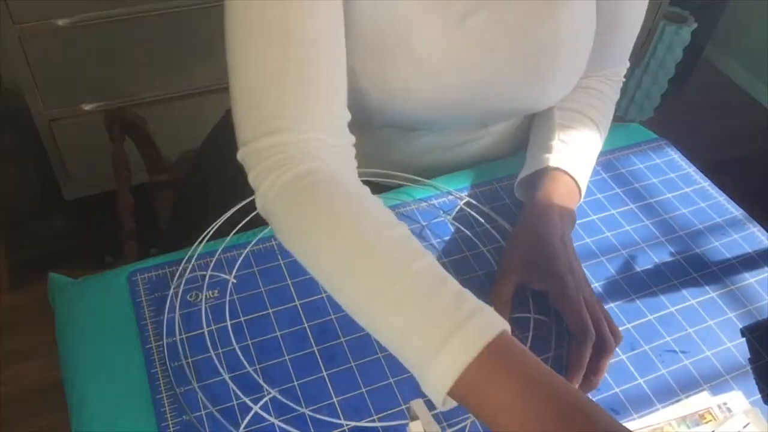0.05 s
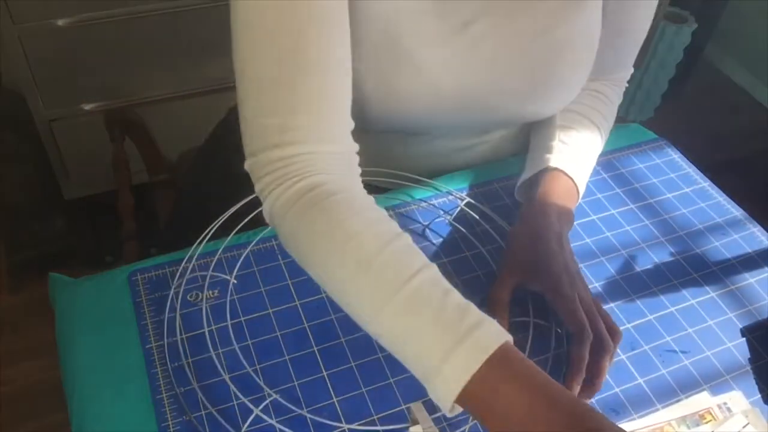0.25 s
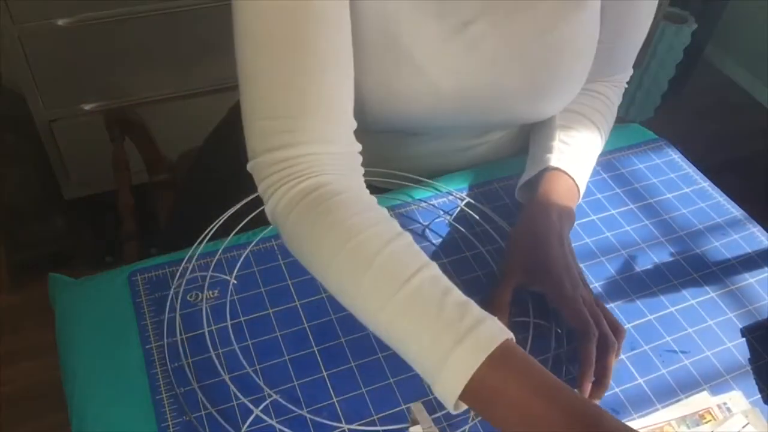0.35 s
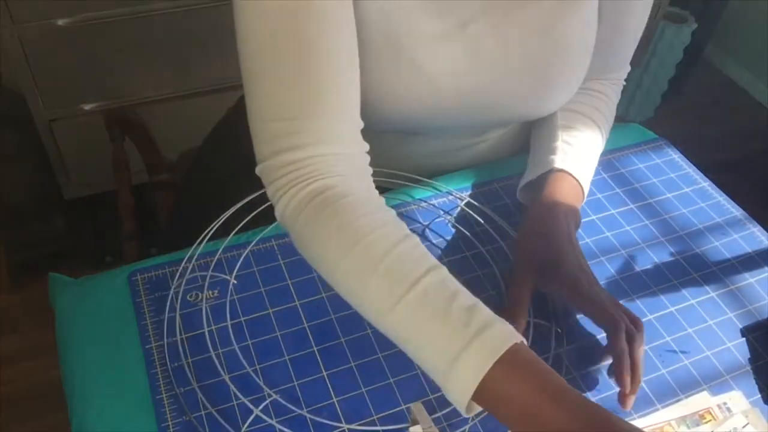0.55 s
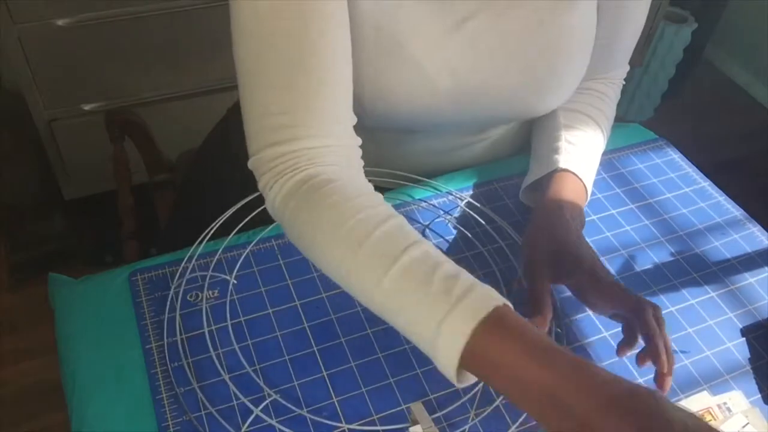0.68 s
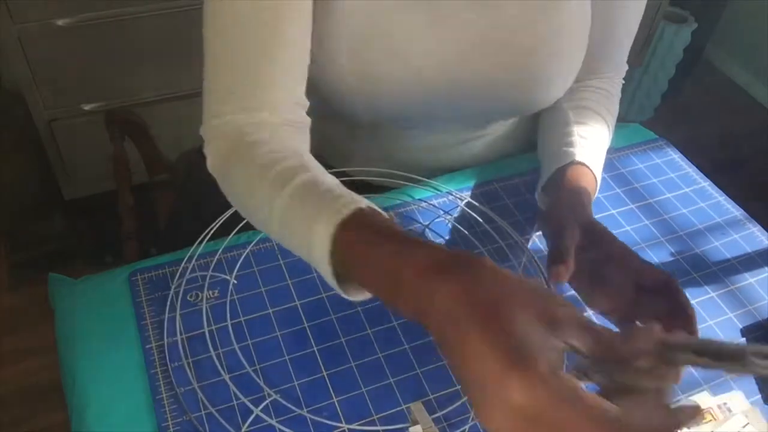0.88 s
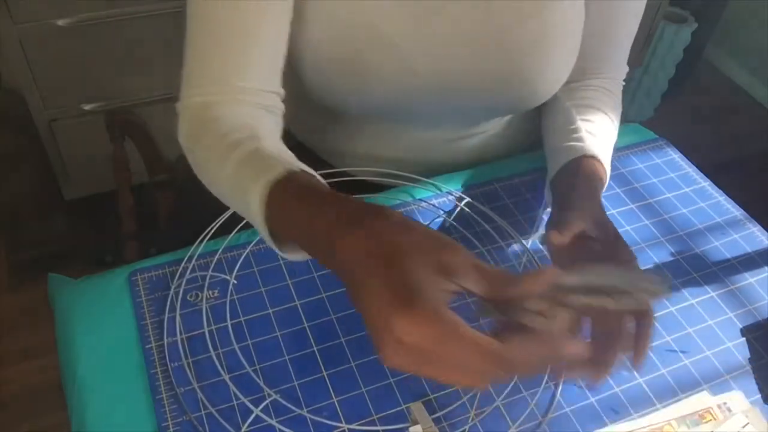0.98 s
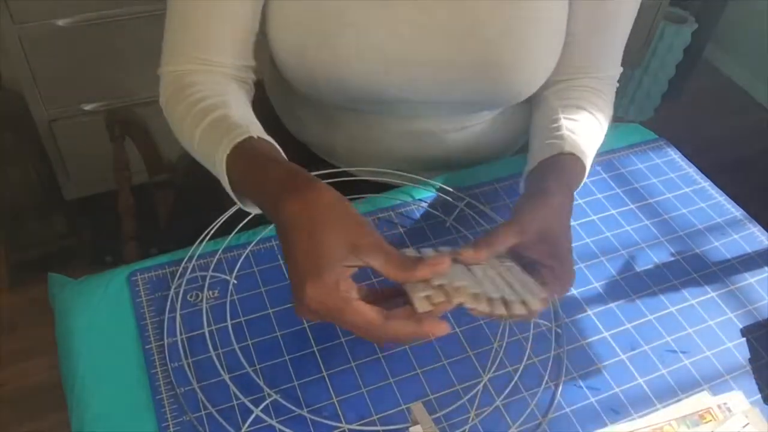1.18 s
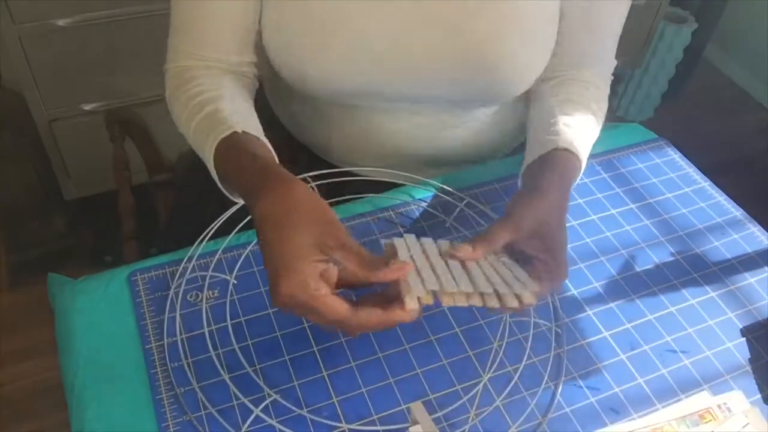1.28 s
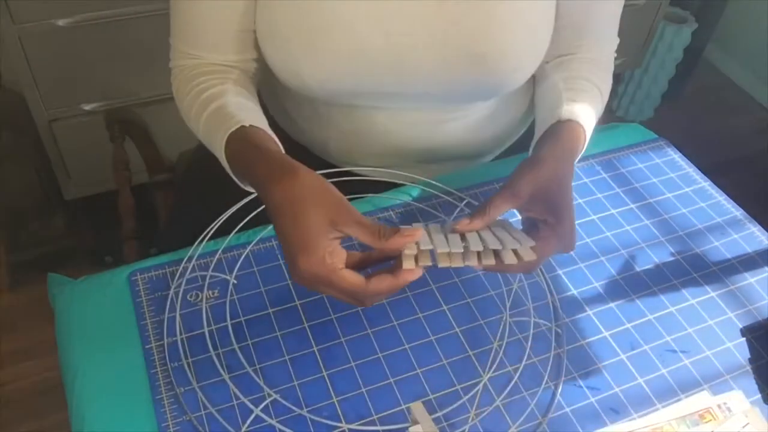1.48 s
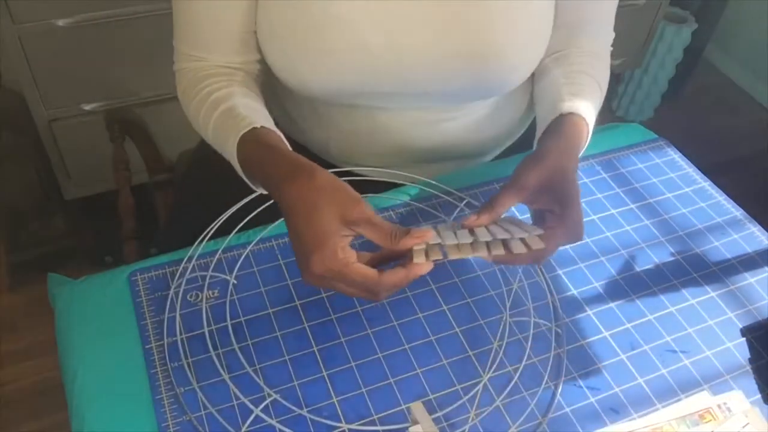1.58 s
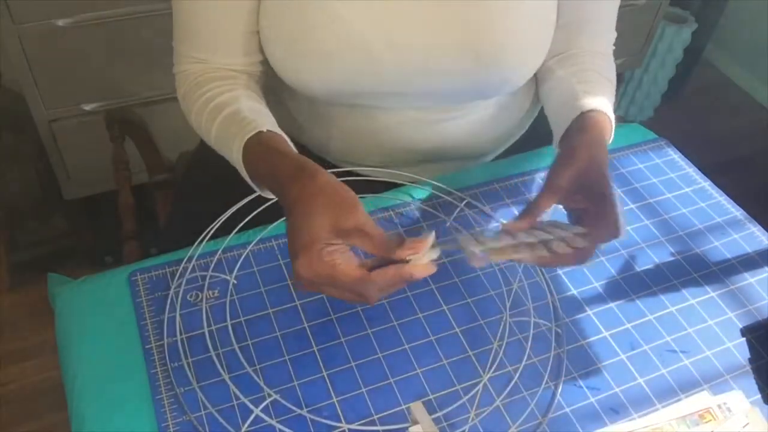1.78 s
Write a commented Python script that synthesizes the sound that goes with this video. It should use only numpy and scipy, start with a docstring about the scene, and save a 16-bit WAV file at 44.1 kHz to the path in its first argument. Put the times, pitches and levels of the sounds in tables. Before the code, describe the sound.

A wooden clack on a table, followed by faint scrapes, ticks and sleeve rustle.

```python
"""A small mat of wooden pegs clacks on a padded craft table in a quiet room. After the fading ring of an
earlier knock, a hard tip strikes, the flat side lands just after and the table top thuds, with a short room
echo. The pegs then scrape and tick against each other as they are picked up. Sleeves brush softly while the
piece is turned in the hands, and a few light ticks close the scene."""
import sys
import numpy as np
from scipy import signal
from scipy.fft import rfft, irfft
from scipy.io import wavfile

SR = 44100
rng = np.random.default_rng(int(sys.argv[2]) if len(sys.argv) > 2 else 0)


def bounce(signal):
    """Save signal as a 16-bit WAV file at the path given by the first command-line argument."""
    frames = np.transpose(np.atleast_2d(signal))
    limited = np.clip(frames, -1, 1)
    pcm = np.round(limited * 32767).astype(np.int16)
    wavfile.write(sys.argv[1], SR, pcm)


N = 81585

# ring of the wooden pegs (frequency [Hz], relative level [dB], t60 [s])
PEG_MODES = [(1671, 4, 0.0097), (2110, 5.5, 0.0053), (2840, -0.5, 0.013), (3320, 7.5, 0.0051),
             (4350, -1, 0.007), (5100, -6, .012), (6365, 4, 0.0041), (7510, 0, 0.007), (8835, -10.5, 0.014),
             (9640, -4, 0.02), (12520, 2.5, 0.0024)]
PEG_T60_MAX_S = 0.028


def amp(db):
    """Decibels to gain."""
    return 10 ** (np.asarray(db) / 20)


def unit_rms(x):
    """Scales to rms 1."""
    return x / np.sqrt(np.mean(x ** 2) + 1e-20)


def add(mix, start, sound):
    """Mixes a sound in at start seconds."""
    part = mix[max(round(start * SR), 0):][:len(sound)]
    part += sound[:len(part)]


def noise(spectrum):
    """Noise of rms 1, coloured by (frequency [Hz], relative level [dB]) points."""
    points_hz, db = np.transpose(spectrum)
    hz = np.fft.rfftfreq(N, 1 / SR)
    colour = amp(np.interp(np.log(hz + 1), np.log(points_hz), db))
    return unit_rms(irfft(rfft(rng.standard_normal(N)) * colour, N))


def dull(x, hz, order=1):
    """Low-pass: a softer contact loses the treble above hz."""
    return signal.lfilter(*signal.butter(order, min(hz, SR / 2 - 1000), fs=SR), x)


def decay(t, t60):
    """A fade that falls 60 dB in t60 seconds."""
    return np.exp(-np.log(1000) * t / t60)


def ring(modes, pitch=1, max_t60=np.inf):
    """A struck body: dying sines, neighbours in opposite sign; max_t60 caps their ring time."""
    t = np.arange(SR // 2) / SR
    return sum((-1) ** k * amp(db) * decay(t, min(t60, max_t60)) * np.sin(2 * np.pi * hz * pitch * t)
               for k, (hz, db, t60) in enumerate(modes) if hz * pitch < SR / 2)


def arch(seconds):
    """A half-sine rise and fall."""
    count = max(int(seconds * SR), 2)
    return np.sin(np.pi * (np.arange(count) + .5) / count)


def room_tone():
    """The still air of the room: a faint, steady bed, strongest in the bass."""
    # colour of the air (frequency [Hz], relative level [dB])
    air_spectrum = [(15, -56), (25, -29), (43, -6.5), (96, -5.5), (183, -4.5), (209, -13), (274, -8),
                    (322, -8.5), (614, -15.5), (826, -13.5), (1200, -17), (2850, -18.5), (15500, -31.5)]
    return amp(-69) * noise(air_spectrum)


def room_echo(send):
    """The room answers with a diffuse tail in overlapping bands, each with its own level and decay."""
    # reverb bands (centre [Hz], echo level [dB], t60 [s])
    bands = [(68.5, 2.5, 0.16), (159, 6, 0.47), (364, -6, 0.22), (785, 0, 0.27), (1440, -0.5, 0.31),
             (2250, -6, .34), (3400, -1, .28), (5100, -10, 0.32), (8300, -6.5, 0.25), (12200, -3, 0.21),
             (15000, -9.5, 0.34)]
    predelay_s, build_s = 0.0029, 0.0018
    t, hz = np.arange(SR) / SR, np.fft.rfftfreq(SR, 1 / SR)
    reflections = rfft(rng.standard_normal(SR))
    onset = np.clip((t - predelay_s) / build_s, 0, 1)
    log_centres = np.log([row[0] for row in bands])
    tail = np.zeros(SR)
    for pick, (_, db, t60) in zip(np.eye(len(bands)), bands):
        band = np.interp(np.log(hz + 1), log_centres, pick)
        part = irfft(reflections * band, SR) * onset * decay(t, t60)
        tail += amp(db) * part * np.sqrt(np.mean(band ** 2)) / np.linalg.norm(part)
    return signal.fftconvolve(send, tail)[:N]


def sleeves():
    """Cloth hiss that swells quickly and fades slowly, with faint crackle from pegs in the fingers."""
    # sleeve strokes (start [s], length [s], level [dB])
    strokes = [(0.466, 0.099, -67), (1.021, .14, -66), (1.125, 0.24, -77), (1.251, 0.12, -69.5),
               (1.343, 0.12, -72)]
    # colour of brushing cloth (frequency [Hz], relative level [dB])
    cloth_spectrum = [(100, -33), (300, 12), (800, -2.5), (2000, -1.5), (4500, -2.5), (8000, -5),
                      (12000, -13.5), (16000, -13)]
    crackles_per_s, crackle_gain = 250, 0.2
    envelope = np.zeros(N)
    for start, length, db in strokes:
        progress = np.linspace(0, 1, int(length * SR))
        add(envelope, start, amp(db) * np.sin(np.pi * progress ** 0.44))
    grains = (rng.random(N) < crackles_per_s / SR) * rng.standard_normal(N)
    crackle = unit_rms(signal.fftconvolve(grains, ring(PEG_MODES, max_t60=PEG_T60_MAX_S))[:N])
    return envelope * (noise(cloth_spectrum) + crackle_gain * crackle)


def table_ring():
    """The table top's ring: strong modes over a crowd of weak ones, played as dying noise."""
    # strong modes of the top (frequency [Hz], level [dB], t60 before the cap [s])
    top_modes = [(56, -37, 0.1), (86.4, -38.5, 0.1), (111, -41, 0.14), (152.9, -32, 0.17),
                 (287.4, -36.5, 0.073), (416, -37, 0.13), (509, -37, 0.089), (691, -34.5, 0.1),
                 (769, -41.5, 0.12), (986, -46.5, 0.13), (1224, -50, 0.22), (1410, -45, 0.21),
                 (1490, -53, 0.043), (1724, -43, 0.099), (2064, -41.5, 0.19), (2360, -44, 0.17)]
    # colour of the crowded weak modes (frequency [Hz], relative level [dB])
    crowd_spectrum = [(60, -34), (200, 0), (300, 2), (550, 8), (1100, -15.5), (2500, -21), (8000, -42)]
    strong = ring(top_modes, max_t60=0.15)
    t = np.arange(len(strong)) / SR
    crowd = amp(-44) * noise(crowd_spectrum)[:len(t)] * decay(t, t60=0.12)
    return strong + crowd


def peg_scrapes():
    """Dense tiny slips ring the finger-damped pegs and the table under them."""
    # pegs sliding on each other (start [s], length [s], level [dB], low edge [Hz], high edge [Hz],
    # ring pitch [ratio], table level relative to the pegs [dB])
    slides = [(0, 0.014, -60.5, 486, 2800, 0.75, -7), (0.012, 0.064, -71, 100, 2670, 0.79, -8),
              (0.144, 0.017, -57.5, 6900, 14000, 0.8, -15), (0.163, 0.0084, -48, 1990, 7800, 1.05, -14),
              (0.178, 0.094, -52, 504, 6060, .92, 2.5), (0.539, 0.046, -59.5, 101, 2470, 0.9, -6),
              (0.592, 0.045, -59, 1500, 3470, 0.922, -11), (0.681, 0.016, -66.5, 1980, 3280, 1.85, 6),
              (0.721, 0.035, -55, 900, 4700, 0.993, -1), (0.714, 0.068, -72, 9000, 16000, 0.91, -21),
              (0.75, 0.0084, -46.5, 305, 2700, 0.99, -14), (1.777, 0.0075, -67, 2500, 3220, 0.94, -12),
              (1.82, 0.043, -69, 2520, 16200, 1.23, -16), (1.836, 0.014, -65.5, 510, 2500, 0.76, -21)]
    slips_per_s, slip_spread_db, hiss_gain = 2400, 3, 0.2
    out, top = np.zeros(N), table_ring()
    for start, length, db, low_hz, high_hz, pitch, table_db in slides:
        slipping = rng.random(SR // 4) < slips_per_s / SR
        slip_db = slip_spread_db * np.minimum(rng.exponential(1, SR // 4), 2)
        hiss = rng.standard_normal(SR // 4)
        slips = slipping * amp(slip_db) * np.sign(hiss)
        friction = dull(unit_rms(slips) + hiss_gain * hiss, high_hz, order=2)
        friction -= dull(friction, low_hz)  # thins out the lows
        swell = arch(length) ** .5
        pegs = ring(PEG_MODES, pitch, PEG_T60_MAX_S)
        body = pegs / np.linalg.norm(pegs) + amp(table_db) * top / np.linalg.norm(top)
        scrape = signal.fftconvolve(friction[:len(swell)] * swell, body)
        add(out, start, amp(db) * scrape * np.sqrt(len(swell)) / np.linalg.norm(scrape))
    return out


def table_thuds():
    """Each push rings the table top; slow pushes reach only its lowest modes."""
    # pushes on the top (time [s], level [dB], contact time [s], low cut [Hz])
    pushes = [(.145, -17, 0.0039, 109), (0.157, -12.5, 0.0054, 110), (.166, -16.5, 0.0028, 70),
              (0.2195, -1, 0.00095, 49.97), (.226, -1.5, 0.00856, 30.4), (0.299, -17, 0.0031, 69.6),
              (.345, -31, 0.011, 48), (0.36, -14, 0.0091, 30.7), (0.407, -18, 0.0054, 89),
              (0.424, -19.5, 0.0043, 92), (0.546, -14.5, 0.0042, 155), (0.562, -13, 0.0035, 149),
              (.757, -21.5, 0.0029, 83)]
    force = np.zeros(N)
    for start, db, contact_s, low_hz in pushes:
        push = np.pad(arch(contact_s) ** 2, (0, SR // 10))
        low_cut = signal.butter(2, low_hz, "high", fs=SR)
        add(force, start, amp(db) * signal.lfilter(*low_cut, push / push.sum()))
    return signal.fftconvolve(force, table_ring())[:N]


def peg_clacks():
    """Tip strikes and flat landings, each with a brief chatter; returns firm hits and light touches."""
    # hard tips striking (time [s], level [dB], treble cutoff [Hz], ring pitch [ratio])
    tip_strikes = [(0.1669, -21.5, 9050, 0.88), (0.198, -26, 9000, 1.04), (0.2147, 0.5, 11000, 1),
                   (0.2175, -16, 13100, 1.75), (.2248, -40, 12000, 1), (0.228, -21, 15070, 1.5),
                   (0.245, -29, 9000, 2.1), (0.6145, -30.5, 11600, 1.665), (0.83, -39, 9800, 1.28),
                   (1.76, -41.5, 18100, 2.2), (1.8400, -37.5, 14700, 0.93)]
    # bright ring of a tip (frequency [Hz], level [dB], t60 [s])
    tip_modes = [(1425, -28.5, 0.0069), (3330, -29, 0.011), (4080, -23, 0.0026), (5213, -17.5, 0.0051),
                 (5990, -20.5, .008), (6500, -19.5, 0.0059), (8360, -16, 0.0017), (9530, -23, 0.007),
                 (11700, -25, 0.00226), (14720, -25.5, 0.0025)]
    # flat sides landing (time [s], level [dB])
    landings = [(0.2076, -12), (0.2202, 0), (.2630, -15), (0.606, -43), (0.6117, -29), (1.7790, -41)]
    # lower knock of a flat side (frequency [Hz], level [dB], t60 [s])
    flat_modes = [(370, -24, 0.011), (1190, -16.5, 0.0024), (2080, -15, 0.0052), (2522, -20, 0.0059),
                  (3700, -32.5, 0.0076), (5460, -27.5, 0.0029)]
    chatter_db, chatter_t60_s, firm_above_db = -23.5, 0.014, -22
    hits = [(start, db, dull(ring(tip_modes, pitch), hz, order=2))
            for start, db, hz, pitch in tip_strikes]
    hits += [(start, db, ring(flat_modes)) for start, db in landings]
    firm, light = np.zeros(N), np.zeros(N)
    t = np.arange(SR // 20) / SR
    for start, db, body in hits:
        force = amp(chatter_db) * rng.standard_normal(len(t)) * decay(t, chatter_t60_s)
        force[0] = 1  # the impact itself, ahead of the chatter
        add(firm if db > firm_above_db else light, start, amp(db) * signal.fftconvolve(force, body))
    return firm, light


def scene():
    """The handling over room tone, in mono; firm hits feed the echo fully, the rest stays drier."""
    firm, light = peg_clacks()
    thuds, scrapes = table_thuds(), peg_scrapes()
    echo = room_echo(firm + amp(-9) * light + amp(-9) * thuds + amp(-11) * scrapes)
    return (firm + light + thuds + scrapes + echo + sleeves() + room_tone())[None]


def record(dry):
    """A steep high cut takes off the very top of the treble."""
    cutoff_hz = 15900
    high_cut = signal.firwin(511, cutoff_hz, window=("kaiser", 9), fs=SR)
    return signal.oaconvolve(dry, high_cut[None], "same")


dry = scene()
out = record(dry)
bounce(out)
```